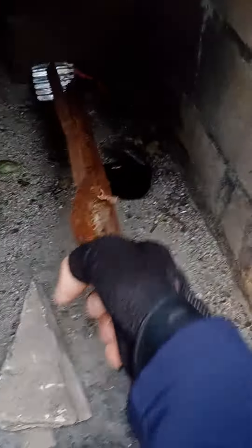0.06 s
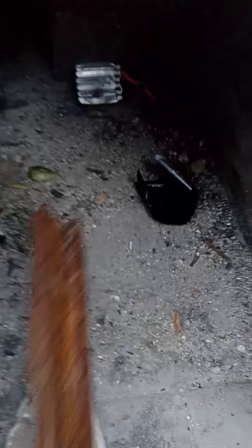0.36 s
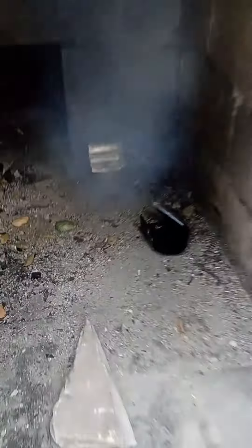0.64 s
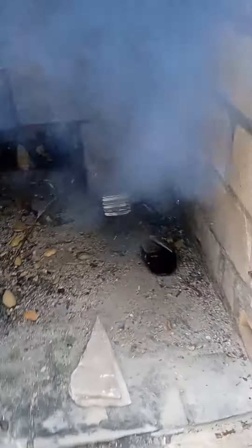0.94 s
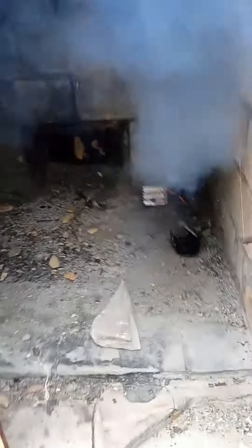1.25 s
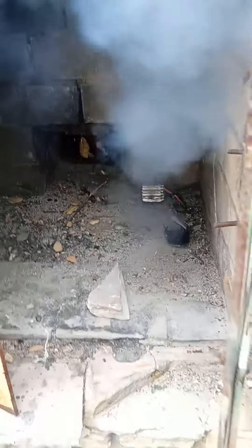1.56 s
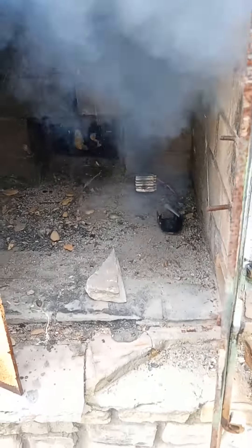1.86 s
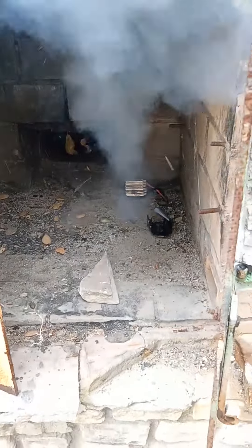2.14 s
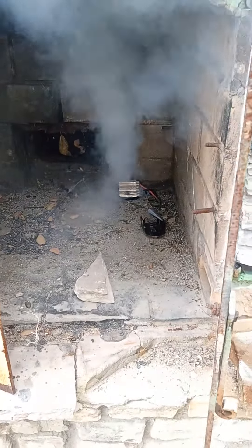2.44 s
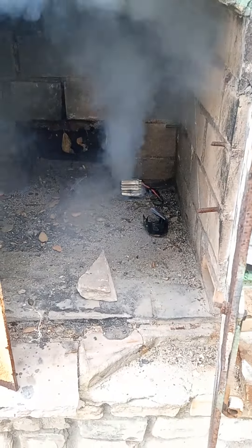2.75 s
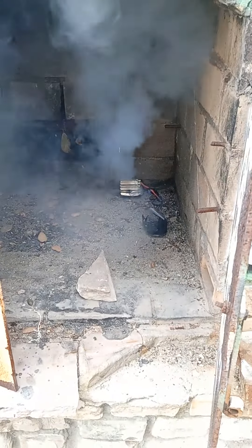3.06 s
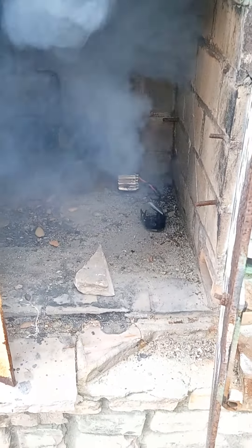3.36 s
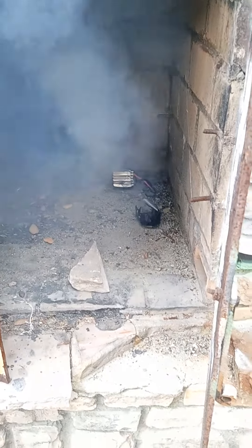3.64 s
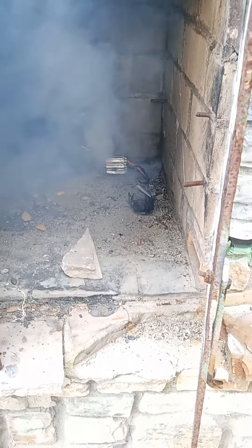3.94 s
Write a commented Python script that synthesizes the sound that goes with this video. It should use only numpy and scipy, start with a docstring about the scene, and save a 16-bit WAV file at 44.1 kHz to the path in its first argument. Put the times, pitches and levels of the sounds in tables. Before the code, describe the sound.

Gas hisses loudly from a venting battery pack, with spits and squeals, then sputters and weakens.

```python
"""A battery pack vents in a stone fireplace, heard from just outside the hearth.
Its jet of gas is turbulent noise coloured by the fireplace: a thin high fizz opens into a roaring
hiss, then sinks and sputters as the gas runs down. The torn vent spits, whistles and squeals in
short glides, and the close stone walls echo it all. Underneath, air buffets the microphone now
and then over a faint outdoor rumble."""
import sys
import numpy as np
from scipy import signal
from scipy.fft import rfft, irfft
from scipy.io import wavfile

SR = 44100
rng = np.random.default_rng(int(sys.argv[2]) if len(sys.argv) > 2 else 0)


def pcm_store(signal):
    """Save signal as 16-bit PCM."""
    levels = np.round(np.clip(np.atleast_2d(signal), -1, 1) * 32767)
    wavfile.write(sys.argv[1], SR, levels.astype(np.int16).T)


N = 176400
TIME = np.arange(N) / SR


def amp(db):
    """Decibels to gain."""
    return 10 ** (np.asarray(db) / 20)


def unit_rms(x):
    """Scales a signal to rms 1."""
    return x / np.sqrt(np.mean(x ** 2) + 1e-20)


def wander(size, hz):
    """A smooth random modulator of rms 1, rolling off above hz."""
    padded = 2 ** int(np.ceil(np.log2(size + SR // 16)))
    f = np.fft.rfftfreq(padded, 1 / SR)
    spectrum = rfft(rng.standard_normal(padded)) / np.sqrt(1 + (f / hz) ** 4)
    return unit_rms(irfft(spectrum))[:size]


def noise_band(centre_hz, octaves):
    """Noise in a bell-shaped band."""
    f = np.fft.rfftfreq(N, 1 / SR) + 1
    bell = np.exp(-.5 * (np.log2(f / centre_hz) / octaves) ** 2)
    return unit_rms(irfft(rfft(rng.standard_normal(N)) * bell, N))


def puff(start, db, attack_s, decay_s, centre_hz, octaves):
    """A burst of air: band noise with a linear attack and an exponential decay."""
    t = TIME - start
    envelope = np.clip(t / attack_s, 0, 1) * np.exp(-np.maximum(t - attack_s, 0) / decay_s)
    return amp(db) * envelope * noise_band(centre_hz, octaves)


# Where the fireplace rings. Each row: centre in Hz, width in Hz, an unused level in dB.
HEARTH_RESONANCES = [(490, 64, -4), (910, 29, -3), (1185, 55, -2), (1600, 1000, -1), (2180, 73, -5),
                     (2700, 77, -3), (3050, 42, -5), (3120, 76, -4), (3580, 89, 0), (4620, 76, -6),
                     (4900, 58, -4), (5320, 130, -4), (5820, 53, -2), (6400, 170, -2)]

def turbulence(colour, patch_db, patch_s, patch_hz):
    """Noise with an EQ curve, a 6 dB lift at the fireplace's resonances and drifting bright patches."""
    hz, t, spectrogram = signal.stft(rng.standard_normal(N), SR, nperseg=1024, noverlap=768)
    blur = np.outer(signal.windows.gaussian(61, patch_hz / hz[1]),
                    signal.windows.gaussian(61, patch_s / t[1]))
    patches = unit_rms(signal.fftconvolve(rng.standard_normal(spectrogram.shape), blur, "same"))
    colour_hz, colour_db = np.transpose(colour)
    curve_db = np.interp(np.log(hz + 1), np.log(colour_hz), colour_db)
    low_cut_db = -40 * np.log10(np.maximum(colour_hz[0] / (hz + 1), 1))
    peaks = np.max([1 / (1 + (2 * (hz - f) / width) ** 2) for f, width, _ in HEARTH_RESONANCES], axis=0)
    notch_db = -2 * np.exp(-((hz - 2780) / 65) ** 2)
    eq_db = curve_db + low_cut_db + 6 * peaks + notch_db
    spectrogram *= amp(eq_db[:, None] + patch_db * patches)
    return unit_rms(signal.istft(spectrogram, nperseg=1024, noverlap=768)[1][:N])


# EQ of the outdoor rumble. Each row: frequency in Hz, relative level in dB.
RUMBLE_EQ = [(20, -26), (45, -4), (70, 18), (120, -8), (200, 4), (400, -14), (1200, -45)]
# Buffets of air. Each row: start in seconds, peak in dB, attack and decay in seconds, centre in Hz.
WIND_GUSTS = [(0, -36, 0.037, 0.066, 400), (.01, -37, 0.022, 0.044, 84.4), (0.598, -43, .012, 0.03, 127),
              (.69, -49, 0.012, 0.035, 96), (.88, -47, 0.016, 0.043, 109), (1.66, -47.5, 0.091, 0.14, 90),
              (2.37, -39, 0.06, 0.046, 109), (2.57, -46, 0.02, 0.34, 113), (3.2, -53, 0.035, .08, 90),
              (3.45, -57, .05, 0.29, 77.5)]

def wind():
    """Low gusts buffet the microphone over a faint, lumpy bed of rumble."""
    rumble = amp(-62) * turbulence(RUMBLE_EQ, patch_db=3.5, patch_s=.03, patch_hz=90)
    return rumble + sum(puff(*gust, octaves=.7) for gust in WIND_GUSTS)


# Early reflections off the nearest walls. Each row: delay in seconds, gain before the wet amount.
WALL_ECHOES = [(.00125, 0.053), (.0021, .14), (.00275, 0.12), (.004, 0.21), (.0047, 0.16), (.0062, .12),
               (.0076, 0.088)]

def fireplace(source, wet, tail_db=-5.5, t60_s=.076):
    """Direct sound, echoes off the close stone walls, then a short reverb tail."""
    t = np.arange(SR // 4) / SR
    after_echoes = t > WALL_ECHOES[-1][0]
    response = rng.standard_normal(len(t)) * amp(-60 * t / t60_s) * after_echoes
    response *= wet * amp(tail_db) / np.linalg.norm(response)
    response[0] = 1
    for delay, gain in WALL_ECHOES:
        response[round(delay * SR)] += wet * gain
    return signal.fftconvolve(source, response / np.linalg.norm(response))[:N]


# Spits of gas. Each row: start in seconds, peak in dB, decay in seconds, centre in Hz.
GAS_SPURTS = [(.398, -31.5, 0.032, 4300), (0.721, -30.5, 0.063, 3700), (.853, -23.5, 0.0059, 5200),
              (2.755, -34, 0.0045, 1890), (2.82, -37.5, 0.0076, 3570), (3.916, -36, 0.0092, 1120),
              (3.969, -29, 0.0016, 6240)]

def spurts(attack_s=.003):
    """The vent spits sharp bursts of noise as it clears."""
    return sum(puff(start, db, attack_s, decay_s, hz, octaves=.45)
               for start, db, decay_s, hz in GAS_SPURTS)


# Squeals of the vent. Each row: start and length in seconds, pitch in Hz at the start, middle and end,
# levels of harmonics 1 to 4 in dB before trim, roughness from 0 to 1.
VENT_WHISTLES = [(0.43, 0.05, 3720.0, 3850, 3790.0, -47, -38, -51, -38, 0.3),
                 (0.58, 0.07, 4460.0, 4550, 4650, -35, -49, -52, -70, 0.3),
                 (0.72, 0.09, 1180.0, 1020.0, 950.0, -36, -52, -46, -55, 0.4),
                 (0.83, 0.1, 990.0, 1000.0, 1030.0, -38, -59, -51, -56, 0.3),
                 (0.93, 0.24, 1160.0, 1230.0, 1210.0, -39, -50, -39, -47, 0.4),
                 (1.19, 0.28, 4200, 3980, 4020, -42, -55, -60, -70, 0.45),
                 (1.29, 0.09, 1960.0, 1840.0, 1820.0, -37, -52, -56, -60, 0.6),
                 (1.35, 0.1, 2650.0, 2470.0, 2500.0, -39, -47, -52, -48, 0.5),
                 (1.52, 0.08, 1180, 1140, 1080, -39, -44, -52, -55, 0.5),
                 (1.57, 0.1, 1010.0, 880.0, 850.0, -39, -33, -44, -46, 0.7),
                 (1.67, 0.16, 830.0, 810.0, 790.0, -39, -35, -48, -45, 0.4),
                 (1.72, 0.12, 2150, 2040.0, 1990.0, -34, -52, -56, -60, 0.7),
                 (1.78, 0.29, 3990, 3950, 4000, -42, -55, -60, -70, 0.5),
                 (1.84, 0.21, 830, 960, 1040, -39, -48, -55, -58, 0.4),
                 (1.86, 0.085, 1875, 1840, 1840, -25, -38, -40, -42, 0.08),
                 (1.95, 0.14, 1850, 1875, 1895, -30, -48, -54, -53, 0.12),
                 (2.11, 0.08, 1300.0, 1230.0, 1110.0, -39, -39, -44, -47, 0.5),
                 (2.11, 0.18, 3480, 3320, 2920, -36, -33.5, -42, -56, 0.5),
                 (2.18, 0.06, 1720.0, 1630.0, 1550, -38, -45, -50, -45, 0.5),
                 (2.23, 0.13, 3400, 3220, 3060, -40, -32, -57, -49, 0.4),
                 (2.33, 0.08, 2900, 2700, 2600, -44, -37, -57, -46, 0.7),
                 (2.48, 0.06, 3100.0, 3050, 3070.0, -39, -52, -67, -67, 0.15),
                 (2.9, 0.05, 4110.0, 4210.0, 4590.0, -42, -62, -64, -70, 0.4),
                 (2.96, 0.05, 2960.0, 2720.0, 2630.0, -46, -34, -45, -45, 0.4),
                 (2.98, 0.025, 2750, 2700, 2620, -48, -29, -50, -48, 0.4),
                 (3.01, 0.055, 2500.0, 2480, 2520.0, -33, -37, -44, -43, 0.25),
                 (3.065, 0.075, 2630.0, 2960.0, 2920.0, -59, -32, -50, -46, 0.4),
                 (3.13, 0.07, 2450.0, 2240.0, 2140.0, -50, -52, -39, -48, 1),
                 (3.13, 0.13, 3250, 3250, 3250, -46, -36, -48, -61, 1),
                 (3.135, 0.06, 2550, 2400, 2450, -37, -46, -55, -60, 0.9),
                 (3.215, 0.04, 1780.0, 1820, 1860.0, -35, -43, -47, -47, 0.5),
                 (3.3, 0.11, 3350, 3320.0, 3330.0, -37, -32, -45, -51, 0.5),
                 (3.41, 0.105, 3700, 3500, 3330, -58, -36, -52, -56, 0.7),
                 (3.42, 0.09, 2550.0, 2400.0, 2160.0, -40, -42, -33, -46, 0.7),
                 (3.49, 0.065, 2650.0, 2680, 2740.0, -63, -39, -49, -36, 0.5),
                 (3.51, 0.06, 2750, 2700, 2650, -45, -40, -52, -55, 0.5),
                 (3.545, 0.05, 4200, 4050, 3950, -38, -48, -42, -70, 0.4),
                 (3.545, 0.1, 2700.0, 2420.0, 2180.0, -37, -38, -46, -47, 0.5),
                 (3.635, 0.04, 3330, 3200.0, 3210.0, -38, -36, -53, -58, 0.3),
                 (3.695, 0.09, 4350, 3940.0, 3720.0, -38, -38, -45, -70, 0.35),
                 (3.755, 0.035, 4260.0, 4360.0, 4450, -62, -41, -68, -70, 0.3),
                 (3.787, 0.043, 4830, 4880, 4870, -48, -32, -46, -70, 0.08),
                 (3.84, 0.022, 4900, 4900, 4880, -49, -33, -45, -70, 0.15),
                 (3.868, 0.018, 4870, 4860, 4840, -49, -32, -45, -70, 0.12),
                 (3.968, 0.032, 3260.0, 3190, 3190.0, -37, -40, -49, -67, 0.12)]

def whistles(attack_s=.0085, release_s=.01):
    """The torn vent whistles in arcs; turbulence shakes the pitch, breaks up the tone and adds rasp."""
    out = np.zeros(N + SR)
    for start, length, first_hz, middle_hz, last_hz, *harmonics_db, roughness in VENT_WHISTLES:
        t = np.arange(0, length + release_s / 2, 1 / SR)
        n = len(t)
        glide_hz = np.polyval(np.polyfit([0, .5, 1], [first_hz, middle_hz, last_hz], 2), t / length)
        shake = .0272 * wander(n, hz=228) + .016 * wander(n, hz=45)  # fast jitter, slower wobble
        phase = 2 * np.pi * np.cumsum(glide_hz * (1 + roughness * shake)) / SR
        gate = np.clip(np.minimum(t / attack_s, (t[-1] - t) / release_s), 0, 1)
        shared_flutter = wander(n, hz=113)
        flutter_db = .4 + 5 * roughness
        breakup = amp(5 * np.sqrt(roughness) * np.minimum(wander(n, hz=40), 1))
        for k, db in enumerate(harmonics_db, 1):
            flutter = (shared_flutter + wander(n, hz=113)) / np.sqrt(2)
            tone = amp(flutter_db * flutter) * np.sin(k * phase)
            rasp = .75 * roughness * wander(n, hz=380) * np.cos(k * phase)
            trim_db = .34 + .28 * k  # tilts slightly bright
            out[round(start * SR):][:n] += amp(db + trim_db) * gate * unit_rms(breakup * (tone + rasp))
    return out[:N]


# Fader rides for the jet's layers: top fizz, bright hiss, midrange roar, the fireplace's hollow body
# and the drone of its lowest mode. Each row: time in seconds, level in dB before trim.
FIZZ_FADER = [(0, -34), (0.1, -29), (0.3, -26.5), (0.7, -26.5), (1.15, -30), (1.3, -31), (1.8, -30.5),
              (2.28, -33.5), (2.55, -41.5), (2.9, -40), (3.1, -39.8), (3.28, -42.3), (3.5, -38.5),
              (3.68, -40), (3.76, -41.8), (3.9, -45), (4, -51)]
HISS_FADER = [(0, -40), (0.15, -34.5), (0.38, -35.5), (0.42, -29.5), (0.52, -34), (0.69, -27.5),
              (0.75, -28.5), (1.22, -26.5), (1.35, -30), (1.7, -29), (1.95, -26), (2.3, -30), (2.44, -31.5),
              (2.56, -39), (2.69, -39.5), (2.74, -35.5), (2.8, -40.5), (2.84, -32.5), (2.95, -40.5),
              (3.02, -32.5), (3.17, -29.5), (3.28, -32.5), (3.35, -34), (3.48, -31), (3.58, -40.5),
              (3.67, -39.2), (3.75, -36.5), (3.82, -38.5), (3.94, -42.5), (4, -39.5)]
ROAR_FADER = [(0, -49), (0.05, -42.5), (0.17, -47), (0.38, -48.5), (0.42, -42), (0.52, -49.5),
              (0.69, -44.6), (0.75, -46), (0.9, -37), (1.02, -34.5), (1.35, -30.5), (1.53, -33),
              (1.62, -33), (1.9, -29), (2.1, -35.0), (2.35, -35), (2.56, -39.5), (2.84, -38.5),
              (3.08, -39.5), (3.16, -34), (3.29, -41), (3.43, -40.5), (3.55, -32), (3.7, -42), (3.9, -42.5),
              (4, -45.4)]
HOLLOW_FADER = [(0, -37), (0.15, -56.5), (0.36, -71), (0.42, -45.5), (0.55, -63.5), (0.69, -49.5),
                (0.75, -37.5), (0.9, -43.6), (1.3, -45), (1.53, -51), (1.62, -42.5), (1.78, -37),
                (2.1, -42), (2.4, -44.7), (2.8, -47), (3.45, -47.5), (3.55, -44.5), (3.65, -47), (4, -49.5)]
DRONE_FADER = [(0, -9), (.55, -18), (.75, -11), (1.5, -27), (1.7, -4), (4, -13)]
# EQ curves of the four broad layers. Each row: frequency in Hz, relative level in dB.
FIZZ_EQ = [(4000, -30), (7500, -14.5), (9000, -5), (10600, 1.5), (12200, -2.5), (13800, -13.5),
           (14700, 7.5), (15700, 0)]
HISS_EQ = [(1500, -22), (2850, -6), (3250, -1), (4000, 1), (4400, -1.5), (5500, 0), (6600, 3.5), (7600, -1),
           (8600, -6), (10600, -2), (13000, -5)]
ROAR_EQ = [(400, -10.5), (800, -4), (1130, -7.5), (1500, -3.5), (1900, 0.5), (2080, -2.5), (2520, -0.5),
           (2720, -15.5), (4500, -30)]
HOLLOW_EQ = [(100, -20), (190, -20.5), (245, -13.5), (300, -16.5), (400, -8), (490, -1.5), (590, -3.5),
             (800, -7), (1000, -5.5), (1500, -18)]

def gas_jet():
    """Escaping gas: five layers of noise share one sputter, which deepens as the pressure falls."""
    sputter = wander(N, hz=27.8) * np.interp(TIME, [2.2, 3.1], [.55, 1.2])

    def ride(fader, trim_db, sputter_depth):
        """A layer's gain: its fader ride, shaken by the sputter."""
        return amp(np.interp(TIME, *np.transpose(fader)) + trim_db + sputter_depth * sputter)

    fizz = turbulence(FIZZ_EQ, patch_db=2, patch_s=.017, patch_hz=200)
    hiss = turbulence(HISS_EQ, patch_db=1.5, patch_s=.028, patch_hz=83.4)
    roar = turbulence(ROAR_EQ, patch_db=3.5, patch_s=.022, patch_hz=48.5)
    hollow = turbulence(HOLLOW_EQ, patch_db=3.5, patch_s=.028, patch_hz=45)
    drone = noise_band(centre_hz=245.7, octaves=.043)
    return (fizz * ride(FIZZ_FADER, trim_db=1.5, sputter_depth=.3)
            + hiss * ride(HISS_FADER, trim_db=-1.28, sputter_depth=1.82)
            + roar * ride(ROAR_FADER, trim_db=-1.5, sputter_depth=1.1)
            + hollow * ride(HOLLOW_FADER, trim_db=4.5, sputter_depth=1.5)
            + drone * ride(DRONE_FADER, trim_db=-55, sputter_depth=-2.2))  # ducks as the rest surge


def scene():
    """The venting pack in the fireplace, with the wind left dry; alike in both channels."""
    gas = fireplace(gas_jet() + spurts(), wet=.75)
    squeals = fireplace(whistles(), wet=.3)
    return np.tile(gas + squeals + wind(), (2, 1))


def record(dry):
    """A steep high cut at 15.8 kHz on the whole mix."""
    high_cut = signal.firwin(801, 15800, window=("kaiser", 9), fs=SR)
    return signal.oaconvolve(dry, high_cut[None], "same")


dry = scene()
out = record(dry)
pcm_store(out)
```